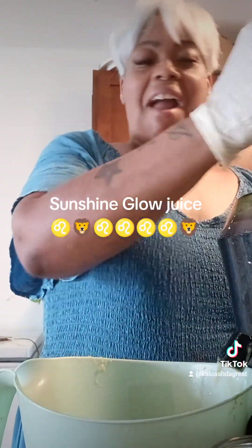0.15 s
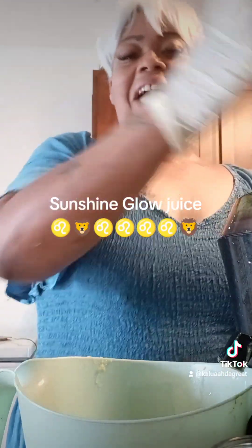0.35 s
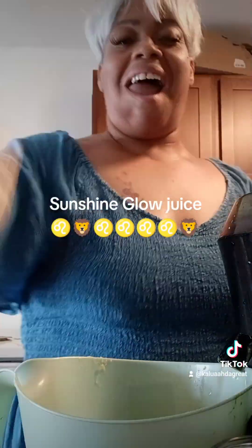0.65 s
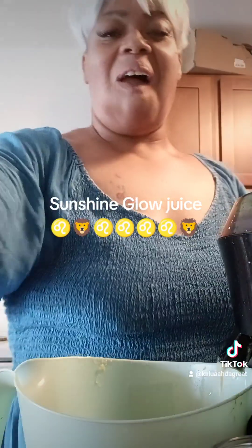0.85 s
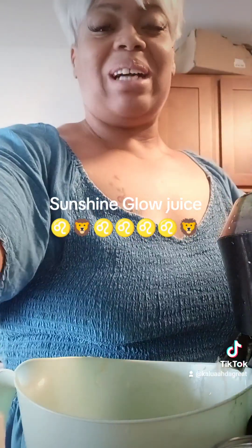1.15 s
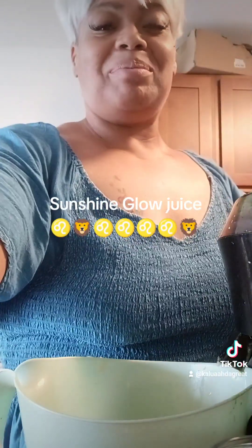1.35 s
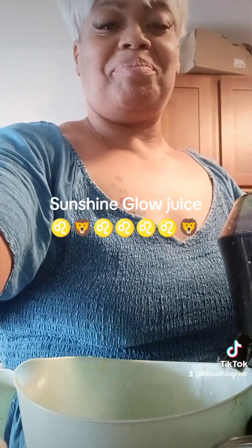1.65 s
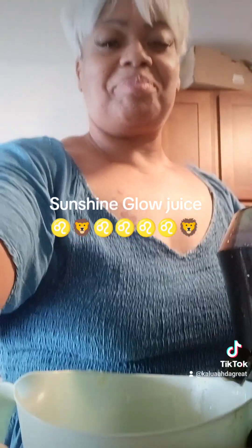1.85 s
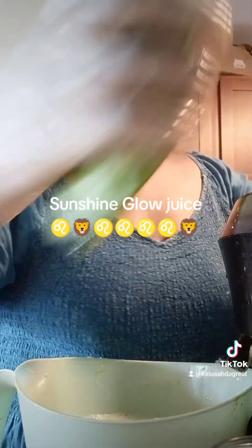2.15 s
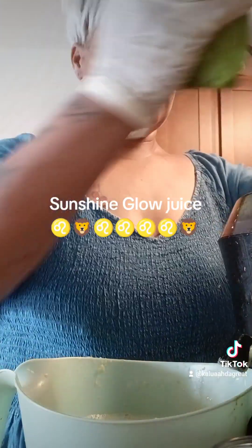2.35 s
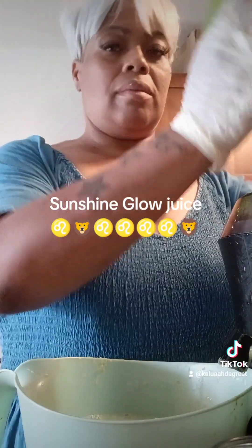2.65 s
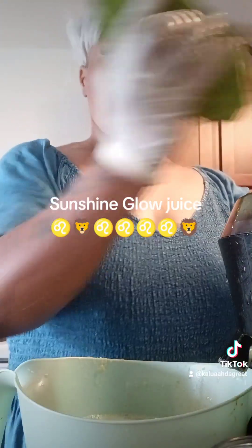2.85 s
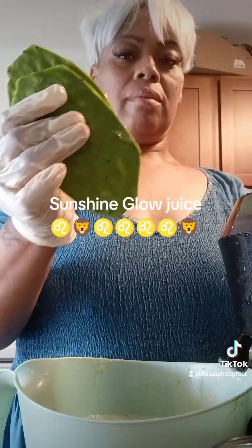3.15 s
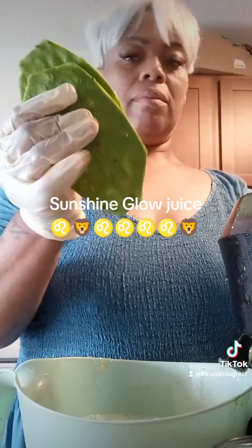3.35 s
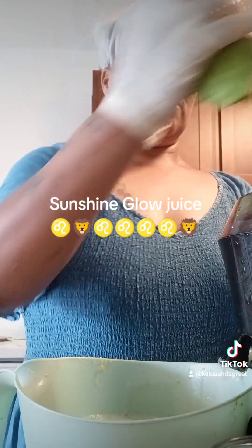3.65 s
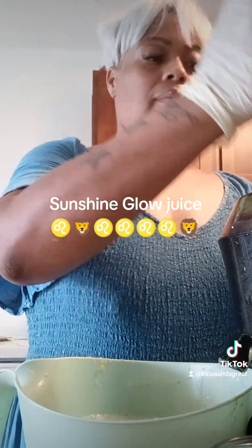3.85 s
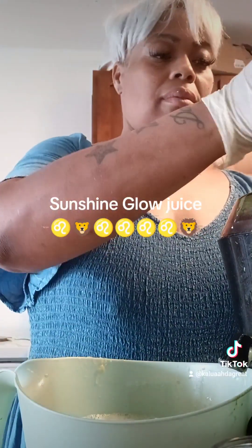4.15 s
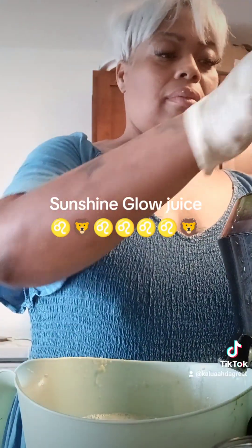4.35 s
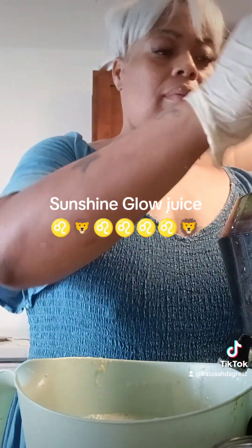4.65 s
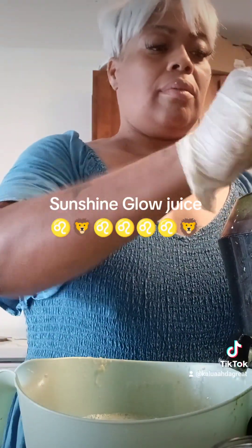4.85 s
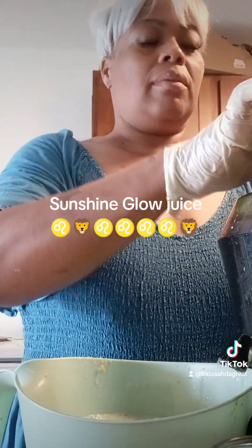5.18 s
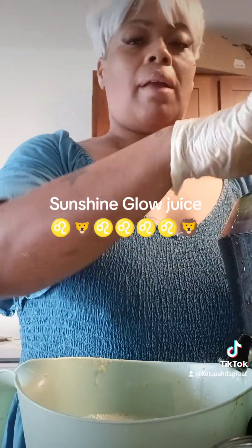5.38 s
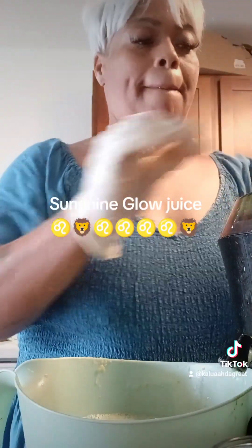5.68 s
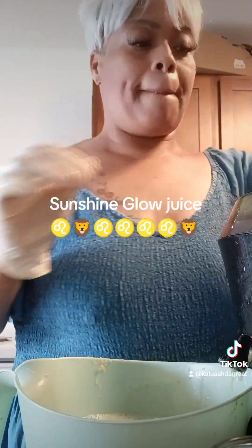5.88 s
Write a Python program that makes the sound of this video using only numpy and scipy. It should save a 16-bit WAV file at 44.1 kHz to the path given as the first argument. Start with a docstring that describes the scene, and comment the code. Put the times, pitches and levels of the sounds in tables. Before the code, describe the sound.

A close, slightly rough capture of an electric juicer in a kitchen. At 0 s the motor is already turning, with a rush of air and pulp; around 0.1 s produce bites the grater in a harsh, metallic, gritty rasp and the motor's pitch drops quickly. From about 0.25 s it climbs back, fast then slower, a thinner whine with overtones blooming as they pass through resonances. At 1.8 s it cuts abruptly to silence for about 0.2 s. Near 2 s it fades in, louder and fuller, swelling to a steady buzzing drone near 200 Hz with fluttering mid tones and breathy high whistles. A faint scrape comes at 3.75 s. From 4.8 to 5.45 s, sharper crunches and scrapes cluster, strongest near 5.15 s; the pitch sags slightly. At 5.5 s a loud, piercing whine around 2.3 kHz bursts out and gradually weakens until the end at 6 s.

```python
"""A kitchen, with an electric juicer close by. A piece of produce drags the motor down and it climbs back;
after a short silence it fades in near full speed, until new produce scrapes the grater and the disc whines.
The shaft is a stack of sines on its turning speed; air and pulp are noise coloured by resonances and dips.
Whistles and hum are narrow rolling noise bands, and each scrape is a burst of grit ringing the disc."""
import sys
import numpy as np
from scipy import signal
from scipy.io import wavfile
from scipy.ndimage import uniform_filter1d

SR = 44100
rng = np.random.default_rng(int(sys.argv[2]) if len(sys.argv) > 2 else 0)


def output_pcm(signal):
    """Save a mono or channel-first signal as 16-bit PCM at the path in sys.argv[1].

    Samples are clipped to [-1, 1] before scaling.
    """
    pcm = np.clip(np.atleast_2d(signal).T, -1, 1) * 32767
    wavfile.write(sys.argv[1], SR, np.round(pcm).astype(np.int16))


N = 265482

# the silence: from t/s, to t/s
PAUSE = (1.7830, 1.9745)


def gain_of(db):
    """dB to amplitude."""
    return 10 ** (np.asarray(db) / 20)


def evened(x):
    """Scales to rms 1."""
    return x / np.sqrt(np.mean(x ** 2) + 1e-20)


def read(points, hz):
    """Reads a spectrum on a log frequency axis."""
    f, value = np.transpose(points)
    return np.interp(np.log(hz + 1), np.log(f + 1), value)


def columns(rows, t):
    """The columns of a curve table at times t."""
    s, *rest = np.transpose(rows)
    return [np.interp(t, s, c) for c in rest]


def wander(t, rate_hz):
    """Slow chance of rms 1: sixteen sines of random phase, none faster than rate_hz."""
    hz = np.geomspace(rate_hz / 8, rate_hz, 16)
    sines = np.sin(2 * np.pi * (np.outer(t, hz) + rng.random(16)))
    return evened(sines @ hz ** -.3)


def resonance(hz, centre_hz, width_hz, db):
    """A bell of lift or cut in dB, down to half its dB at half a width from the centre."""
    return db / (1 + (2 * (hz - centre_hz) / width_hz) ** 2)


def partner(left, other, likeness):
    """A left-right pair whose right side shares the given likeness with the left."""
    return np.array([left, likeness * left + np.sqrt(1 - likeness ** 2) * other])


# left-right balance of the rush and the weaker multiples: f/Hz, left over right/dB
BALANCE = [(60, -2.5), (110, -4.5), (200, -4.5), (380, -3.5), (700, -4.5), (1290, -5), (2380, -6),
           (4400, -10.5), (8120, 0), (15000, 4.5)]


def sides(x, pan_db):
    """Pans by weighting left against right while the sum of their power gains stays constant."""
    lean = gain_of(pan_db)
    return np.array([lean * x[0], x[1]]) * np.sqrt(2 / (1 + lean ** 2))


RISE_DB_PER_S, FALL_DB_PER_S = 300., 200.


def plateau(t, start, end, db, steep=1):
    """A level that rises to db, holds from start to end and falls away."""
    rise = RISE_DB_PER_S * np.maximum(start - t, 0)
    fall = FALL_DB_PER_S * np.maximum(t - end, 0)
    return db - steep * (rise + fall)


# shaft speed after the pause: t/s, turns f/Hz
SPEED = [(1.96, 193.9), (2.3, 197.2), (2.9, 197.9), (3.3, 196.3), (3.7, 197.6), (4.6, 196.3), (4.85, 195.2),
         (5.1, 196.4), (5.2, 193.4), (5.45, 190.3), (5.6, 190.6), (6.02, 191.9)]
START_HZ, SLOWEST_HZ, DRAG_S, DRAG_WIDTH_S = 162.07, 139.26, .118, 0.0256  # produce drags the shaft down
CLIMB_S, CLIMB_TO_HZ, CLIMB_TAU_S = .245, 188.54, .69  # and it recovers, ever more slowly


def speed(t):
    """Shaft turns a second: dragged down, climbing back, then near full speed."""
    fall = 1 / (1 + np.exp(np.minimum((t - DRAG_S) / DRAG_WIDTH_S, 50)))
    drag = SLOWEST_HZ + (START_HZ - SLOWEST_HZ) * fall
    recovery = 1 - np.exp(-np.maximum(t - CLIMB_S, 0) / CLIMB_TAU_S)
    climb = (CLIMB_TO_HZ - SLOWEST_HZ) * recovery
    return np.where(t > PAUSE[0], columns(SPEED, t)[0], drag + climb)


# the rush of air and pulp, before its patches: t/s, level/dB, low roar over it/dB
RUSH = [(0, -36.5, -22), (0.07, -33, -20), (0.2, -34.5, -30), (0.3, -44, -2.5), (1.2, -41.5, -4.5),
        (1.78, -42.5, -3.5), (2.0, -32.5, -1.5), (4.7, -31.5, -4), (5.2, -29.5, -8), (5.4, -34.5, -1.5),
        (5.7, -34, -2.5), (6.01, -36, 4)]
# its relative colour while climbing: f/Hz, density/dB per Hz
RUSH_CLIMB = [(15, -39), (25, -23), (64, -36.5), (108, -7.5), (256, -11), (451, -6.5), (911, -1),
              (1330, -8), (1890, 4.5), (2760, -11), (6050, -7), (8140, -25), (13600, -32), (14800, -28),
              (16000, -28.5)]
# its relative colour at full speed: f/Hz, density/dB per Hz
RUSH_FULL = [(15, -73), (25, -54), (145, -13.5), (195, -17), (516, -12), (796, -8.5), (887, -8.5),
             (1190, -14), (1440, -9.5), (1790, -11.5), (3160, -20), (4740, -14.5), (6050, -19),
             (8590, -36.5), (16000, -37.5)]
# resonances and dips of the rush; the 15 kHz one is the microphone's: f/Hz, width/Hz, lift or cut/dB
RUSH_BELLS = [(274, 92, 11.5), (522, 49.5, -14), (1051.7, 38, 14), (1454, 66, -16), (2477, 137, 8),
              (3490, 860, 4), (15000, 1030, 11.5)]
# how alike left and right are: f/Hz, likeness (1 is identical)
LIKENESS = [(60, 0.69), (180, 0.85), (340, 0.99), (550, 0.19), (1650, 0.076), (4970, -0.37), (15000, 0.17)]


def rush(turns, patchy_db=4.0, throb=0.057):
    """Air and pulp: noise shaped by resonances, patchy in time, pumped once a turn in the treble."""
    frames, hz = N // 256 + 5, np.fft.rfftfreq(1024, 1 / SR)[:, None]
    t = np.arange(frames) * 256 / SR
    a, b, c, d, patches = rng.standard_normal((frames, 513, 5)).T
    patches = uniform_filter1d(patches, size=3, axis=0)
    patches = evened(uniform_filter1d(patches, size=16, axis=1))
    level_db, roar_db = columns(RUSH, t)
    late = t > PAUSE[0]
    colour = np.where(late, read(RUSH_FULL, hz), read(RUSH_CLIMB, hz))
    colour = colour + sum(resonance(hz, *bell) for bell in RUSH_BELLS)
    # the level refers to the power of this band
    band = (hz[:, 0] > 2800) & (hz[:, 0] < 6500)
    colour -= 10 * np.log10((gain_of(colour[band]) ** 2).sum(0))
    low = 1 / (1 + (hz / 1500.0) ** 2)
    # the colours already hold the mean roar, so only its movement is added
    mean_roar = np.where(late, roar_db[late].mean(), roar_db[~late].mean())
    field = colour + level_db + low * (roar_db - mean_roar)
    field = field + patchy_db * (1 - 0.5 * low) * patches
    likeness = np.clip(read(LIKENESS, hz), -1, 1)
    spectrum = partner(a + 1j * b, c + 1j * d, likeness) * gain_of(field)
    spectrum = sides(spectrum, read(BALANCE, hz))
    noise = signal.istft(spectrum, nperseg=1024, noverlap=768)[1][:, :N]
    bass = signal.sosfiltfilt(signal.butter(2, 1500, fs=SR, output="sos"), noise)
    return bass + (noise - bass) * (1 + throb * np.cos(2 * np.pi * turns))


# narrow rolling bands at full speed, in order high whistle, mid whistle, low hum:
# f/Hz, width/Hz, level/dB, left over right/dB, left-right likeness
BANDS = [(4733, 79, -45.5, -32, 0.079), (1833, 40, -39, -48, 0.69), (105.3, 4.4, -58.5, -5.5, 0.95)]
# moments when a band stands out: band index, from t/s, to t/s, level/dB, pitch factor
BAND_SWELLS = [(0, 2.71, 2.85, -33, .992), (0, 3.07, 3.63, -35, 1.013), (0, 3.9, 4.0, -35, .99),
               (0, 4.45, 4.68, -33, .994), (0, 4.9, 5.7, -41, .998), (1, 2.68, 2.76, -28, 1.0),
               (1, 2.58, 2.61, -33, 1.0), (1, 2.83, 2.9, -34, 1.0), (1, 3.44, 3.58, -33, 1.0),
               (1, 4.07, 4.2, -31, 1.0), (1, 2.93, 3.13, -35, 1.0), (2, 4.1, 4.85, -45, 1.0)]


def whistles_and_hum(t):
    """Narrow noise bands: each a carrier with a slowly rolling random strength and phase."""
    out = np.zeros((2, N))
    for k, (rest_hz, width, db, pan_db, likeness) in enumerate(BANDS):
        hz, db = rest_hz + 0 * t, db + 0 * t
        for index, start, end, swell_db, pitch in BAND_SWELLS:
            if round(index) == k:
                swell = plateau(t, start, end, swell_db)
                hz = np.where(swell > db, rest_hz * pitch, hz)
                db = np.maximum(db, swell)
        a, b, c, d = rng.standard_normal((4, N))
        roll = partner(a + 1j * b, c + 1j * d, np.clip(likeness, 0, 1))
        r = np.exp(-np.pi * width / SR)
        roll = signal.lfilter([1], [1, -2 * r, r * r], roll)
        band = (roll * np.exp(2j * np.pi * np.cumsum(hz) / SR)).real
        out += sides(evened(band) * gain_of(db), pan_db)
    return out * (t > PAUSE[0])


# produce scraping the grater: peak t/s, nominal length/s, relative level/dB, disc pitch factor,
# then second, third and fourth mode, hiss and thud, each over that level/dB
SCRAPES = [(.104, 0.021, -26.5, 0.79, -2.5, -1.5, -19, -19, -0.5),
           (0.119, .022, -21.5, 0.84, -8, -11.5, -26, -20, -15),
           (0.126, .012, -28, 0.74, -3, 3.5, -16, -15, -4.5),
           (.118, .035, -31, 1.18, -24, -24.5, -32, -25, -23),
           (0.164, 0.049, -42, 0.74, 9, 10.5, -5, -4, 2.5),
           (3.759, 0.058, -38, 1.09, -20, -25, -28, -25, -25),
           (4.833, 0.0068, -28, 0.9, -9, -11, -28, -9, -20),
           (4.968, 0.036, -35.5, 0.93, 5.5, -23, -34, -16, -14),
           (5.087, 0.034, -28.5, 0.93, -1, -26, -41, -14, -16),
           (5.136, 0.0072, -21, 0.96, 0, -18, -35, -15, -25),
           (5.1426, 0.0052, -21, 0.93, -12, -18, -37, -15, -23),
           (5.15, 0.035, -36, 0.858, 8, -9, -26, -17, -23), (5.152, .025, -43, 1.13, 10, -9, -26, -17, -23),
           (5.154, 0.027, -37.5, 0.99, 9.5, -9, -28, -17, -23),
           (5.16, .008, -24, 1.014, -5, -16, -35, -11, -26),
           (5.193, 0.052, -30.5, 1.03, -15, -32, -40, -23, -12),
           (5.284, 0.033, -32.5, 1.01, 7, -4.5, -25, -4, -18),
           (5.319, 0.042, -35.5, 1.02, -6, -3, -7, 0, -20),
           (5.429, 0.031, -33.5, 0.95, -25, -33, -36, -22, 4.5)]
# what a scrape rings, in order four disc modes, hiss, thud: f/Hz, width/Hz
DISC = [(2260, 163), (4694, 250), (6670, 290), (8850, 340), (15600, 3700), (260, 100)]


def scrapes(turns, teeth=0.23, snap_db=2.0, pan_db=-9.5, low_pan_db=3.5):
    """Produce on the grater: bursts of grit ring the disc modes, which beat with the turning."""
    out = np.zeros((2, N))
    for s, length, db, pitch, *shares in SCRAPES:
        start = max(round((s - length) * SR), 0)
        t = np.arange(start, round((s + 3 * length) * SR)) / SR - s
        span, loop = slice(start, start + len(t)), np.arange(len(t)) % 9000
        reach = np.where(t < 0, 0.78 * length, 0.58 * length)
        shape = np.exp(-np.abs(t / reach) ** 3)
        grit = rng.standard_normal((2, 9000))[:, loop]
        grit[1] = 0.57 * grit[0] + 1.45 * grit[1]
        snaps = np.repeat(np.minimum(rng.exponential(1, 300), 3), 30)[loop]  # a few fibres snap loudly
        grit = evened(grit * gain_of(snap_db * snaps))
        beat = 1 + teeth * np.cos(2 * np.pi * turns[span])  # the disc catches once a turn
        for (hz, width), share_db in zip(DISC, [0] + shares):
            is_mode = 1000 < hz < 10000
            hz = hz * (pitch if is_mode else 1)
            edges = [hz - width / 2, min(hz + width / 2, SR / 2.1)]
            ring = signal.butter(2, edges, "band", fs=SR, output="sos")
            part = evened(signal.sosfilt(ring, grit * shape) * beat)
            part = part * np.sqrt(np.mean(shape ** 2)) * gain_of(db + share_db + 1.0)
            out[:, span] += sides(part, pan_db if is_mode else low_pan_db)
    return out


LOADED_S = 5.2  # produce begins to load the shaft


def loading(t):
    """How far the levels have moved from running free (0) to loaded (1)."""
    return np.clip((t - LOADED_S) / 0.078, 0, 1)


# the strongest multiples: order of the shaft speed
LEAD_ORDERS = [1, 4, 6, 9, 12, 13]
# their base settings, one row an order: level climbing/dB, running free/dB, loaded/dB,
# left over right climbing/dB, at full speed/dB, left phase lead/rad, flutter/dB, flutter in a swell/dB
LEADS = [(-57, -34.5, -36, -2.5, -3, 0.27, -0.2, 5.5), (-59, -39, -42, -15.5, -10.5, -1.46, 2.5, 3.4),
         (-55.5, -43.5, -44.5, -10, 1.5, -1.67, 5, 1.93), (-48.5, -45, -47, -6, -39, 1, 3.5, 2.1),
         (-42, -43.5, -46, -1.5, -12, 1.82, 2.5, -0.24), (-47, -56, -45, -14, -19, 4, 4.5, -1.5)]


def lead_lines(t):
    """The strongest multiples, each with its own pan, phase lead and flutter."""
    late, loaded, lines = t > PAUSE[0], loading(t), []
    for k, row in zip(LEAD_ORDERS, LEADS):
        climb, free, load, pan_climb, pan_full, lead, flutter_db, swell_db = row
        db = np.where(late, free + loaded * (load - free), climb)
        db = db + flutter_db * wander(t, 30.0)
        lines.append((k, db, swell_db, np.where(late, pan_full, pan_climb), lead))
    return lines


MINOR_ORDERS = [k for k in range(2, 39) if k not in LEAD_ORDERS]
# the weaker multiples' base levels, one row an order: climbing/dB, running free/dB, loaded/dB
MINOR = [(-70, -48, -55), (-57, -51.5, -46), (-49, -49, -69), (-61, -67, -45.5), (-51.5, -52, -49),
         (-68, -62, -45), (-50, -50, -47), (-70, -53, -49.5), (-53, -55, -55), (-56, -73, -58),
         (-63.5, -73, -63), (-56.5, -53.5, -51), (-63, -61, -60), (-66.5, -50.5, -54), (-60.5, -54, -50),
         (-68, -68, -59), (-60, -69, -45), (-61, -55, -45), (-60, -47, -50), (-65, -75, -59),
         (-59, -76, -59), (-59, -62, -64), (-64, -57, -54), (-58, -52, -51.5), (-65.5, -52.5, -68),
         (-69, -59, -67), (-60, -67, -62), (-57.5, -63, -52), (-58.5, -79, -53), (-64.5, -77, -56),
         (-61, -83, -54.5), (-53.5, -89, -65)]
# resonances that lift the weaker multiples as they climb through: f/Hz, width/Hz, lift/dB
RINGS = [(1450, 130, 1.5), (1890, 160, 1), (2360, 320, 15), (3357, 120, 12), (4040, 41, 12.5),
         (4770, 155, 11.5), (6370, 460, 6)]


def minor_lines(t, waver_db, swell_waver_db, sag_db):
    """The weaker multiples, lifted by resonances in the climb and wavering in level and pan."""
    late, loaded, turn_hz, lines = t > PAUSE[0], loading(t), speed(t), []
    sag = sag_db * np.clip(165 - turn_hz, 0, None)  # the weaker multiples are quieter while the shaft is slow
    for k, (climb, free, load) in zip(MINOR_ORDERS, MINOR):
        lift = sum(resonance(k * turn_hz, *ring) for ring in RINGS)
        db = np.where(late, free + loaded * (load - free), climb + lift - sag)
        waver = np.minimum(wander(t, 14.0), .7)
        db = db + waver_db * np.where(late, 1, .4) * waver
        pan_db = read(BALANCE, k * turn_hz) - 3.0 + 2.2 * wander(t, 3.32)
        lines.append((k, db, swell_waver_db, pan_db, 0.283 * k * rng.standard_normal()))
    return lines


# moments when a multiple stands out: order, from t/s, to t/s, level before flutter/dB
SWELLS = [(1, -.05, .09, -37), (2, -.05, .07, -41), (11, -.05, .08, -35), (12, -.05, .06, -36),
          (11, .055, .08, -30), (12, .08, .15, -28), (13, .105, .13, -27), (23, -.05, .05, -46),
          (36, -.05, .04, -46), (2, .168, .18, -35), (17, .15, .25, -39), (24, .15, .26, -42),
          (35, .17, .22, -42), (34, .26, .29, -46), (1, .24, .35, -38.5), (17, .31, .42, -42),
          (12, .36, .9, -36.5), (6, .37, .47, -47), (13, .44, .55, -39), (4, .49, .63, -42.5),
          (12, .56, .7, -27.5), (15, .56, .84, -38), (9, .66, 1.1, -37.5), (5, .72, 1.0, -39.5),
          (20, .79, .9, -40), (24, .79, .94, -41), (1, .8, 1.06, -46), (13, .86, 1.05, -39),
          (4, .98, 1.14, -40), (11, 1.08, 1.36, -35.5), (35, 1.0, 1.42, -46), (30, .73, .77, -45),
          (29, .8, .86, -44), (28, 1.0, 1.1, -47), (37, 1.07, 1.15, -45), (38, 1.0, 1.16, -48),
          (28, 1.2, 1.25, -44), (30, 1.23, 1.31, -45), (28, 1.4, 1.48, -44), (32, 1.66, 1.78, -47),
          (13, 1.1, 1.8, -30.5), (5, 1.14, 1.46, -38), (6, 1.14, 1.42, -38), (3, 1.25, 1.58, -45),
          (12, 1.22, 1.32, -34), (4, 1.34, 1.41, -41), (8, 1.3, 1.58, -45), (18, 1.42, 1.53, -40),
          (9, 1.56, 1.8, -37.5), (12, 1.5, 1.8, -36), (8, 1.62, 1.8, -38), (11, 1.6, 1.8, -39),
          (21, 1.64, 1.74, -45), (19, 1.12, 1.26, -45), (6, 2.2, 4.82, -34.5), (14, 2.37, 2.64, -40),
          (14, 2.78, 2.94, -44), (4, 2.31, 2.43, -26), (4, 2.45, 2.52, -29), (4, 2.55, 2.66, -25),
          (4, 2.71, 2.73, -28), (4, 2.78, 2.89, -29), (30, 2.2, 2.28, -44), (30, 2.37, 2.49, -39),
          (30, 2.58, 2.7, -39), (30, 2.88, 2.98, -41), (30, 3.05, 3.45, -45), (4, 2.99, 3.04, -33),
          (4, 3.09, 3.33, -35), (4, 3.4, 3.44, -35), (4, 3.52, 3.59, -31.5), (4, 3.71, 3.75, -33),
          (32, 3.7, 4.3, -46), (13, 3.7, 3.82, -38), (15, 3.78, 3.88, -42), (4, 3.9, 4.05, -30),
          (4, 4.13, 4.255, -27), (4, 4.38, 4.44, -34), (9, 4.05, 4.2, -39), (12, 4.94, 5.06, -33),
          (25, 5.02, 5.055, -37), (12, 5.065, 5.22, -29), (11, 5.14, 5.22, -28), (8, 5.19, 5.27, -35),
          (9, 5.2, 5.27, -37), (12, 5.305, 5.37, -24), (13, 5.3, 5.36, -30), (35, 5.29, 5.36, -42),
          (11, 5.48, 5.72, -33.5), (13, 5.51, 5.63, -31), (24, 5.53, 5.61, -36), (25, 5.55, 5.72, -40),
          (11, 5.72, 5.96, -38), (12, 5.26, 5.5, -30), (12, 5.87, 5.955, -26)]
# the loaded disc whines: order, from t/s, to t/s, level at the start before flutter/dB, decay/dB per s
WHINE = (12, 5.52, 5.87, -14.5, 14.0)
GLIDE_SHARE = 0.69  # of the swell slopes, while the shaft climbs


def swollen(t, k, db, flutter):
    """Lifts one multiple to its swells, and to the whine if it is the whining order."""
    for order, *swell in SWELLS:
        if order == k:
            gliding = CLIMB_S < swell[0] < PAUSE[0]  # a climbing order slides gently through a resonance
            db = np.maximum(db, plateau(t, *swell, GLIDE_SHARE if gliding else 1) + flutter)
    order, start, end, whine_db, decay = WHINE
    if k == order:
        whine = plateau(t, start, end, whine_db) - decay * np.abs(t - start)
        db = np.maximum(db, whine + flutter)
    return db


def orders(turns, t, waver_db=8.0, swell_waver_db=3.0, blur=0.052, sag_db=0.5, rough=0.37, rough_hz=69.8):
    """The shaft's song: sines on its speed, wavering in level and phase, each with its own left-right phase."""
    slow, out = t[::64], np.zeros((2, N))
    late, loaded = slow > PAUSE[0], loading(slow)
    for k, db, flutter_db, pan_db, lead in lead_lines(slow) + minor_lines(slow, waver_db, swell_waver_db, sag_db):
        db = swollen(slow, k, db, flutter_db * wander(slow, 24.0))
        level = sides([gain_of(db)] * 2, pan_db)
        # rattle spreads side tones, less on the steady orders, in the climb and under load
        steady = k in (1, 4, 6)
        rattle = rough * np.where(steady | (loaded > 0), .3, np.where(late, 1, .3))
        shake = 1 + rattle * (wander(slow, rough_hz) + 1j * wander(slow, rough_hz))
        # shaft jitter grows with order
        jitter = blur * k * np.where(late, 1, .4) * wander(slow, 14.0)
        level = level * shake * np.exp(1j * jitter)
        spin = np.sqrt(2) * np.exp(2j * np.pi * k * turns)
        for c in range(2):
            phased = level[c] * np.exp(1j * (1 - c) * lead)
            out[c] += (np.interp(t, slow, phased) * spin).imag
    return out


def scene():
    """The rush, whistles and hum, with the scrapes and orders that follow the shaft."""
    t = np.arange(N) / SR
    turns = np.cumsum(speed(t)) / SR
    return rush(turns) + whistles_and_hum(t) + scrapes(turns) + orders(turns, t)


FADE_S, FADE_FROM_DB, FADE_RISE_S = 0.029, -9, 0.22  # after the pause the sound comes back low and swells
EDGE_HZ = 15900


def record(dry):
    """The microphone drops the deep bass; a hard stop, silence, a fade-in; then the band limit."""
    t = np.arange(N) / SR
    heard = signal.sosfilt(signal.butter(2, 50, "high", fs=SR, output="sos"), dry)
    since = t - PAUSE[1]
    swell = gain_of(FADE_FROM_DB * np.clip(1 - since / FADE_RISE_S, 0, 1))
    gate = np.where(t < PAUSE[0], 1, np.clip(since / FADE_S, 0, 1) * swell)
    band_limit = signal.firwin(511, EDGE_HZ, window=("kaiser", 9), fs=SR)
    return signal.oaconvolve(heard * gate, band_limit[None], "same")


dry = scene()
out = record(dry)
output_pcm(out)
```